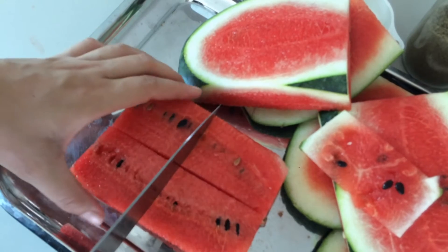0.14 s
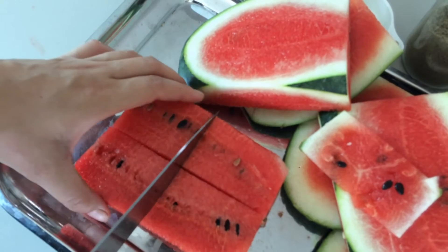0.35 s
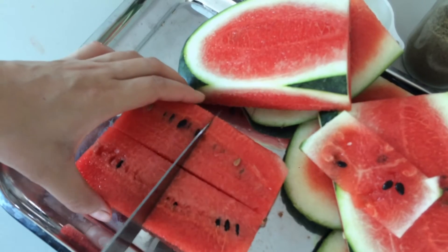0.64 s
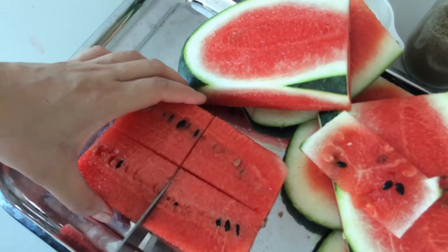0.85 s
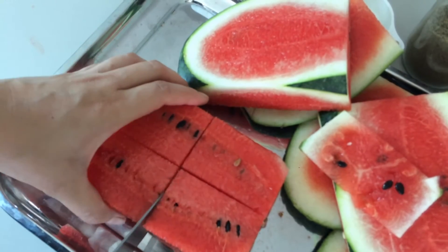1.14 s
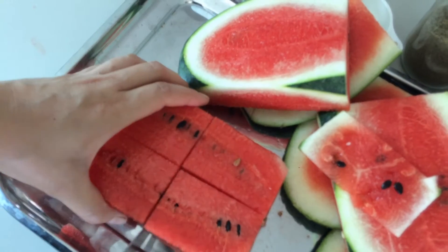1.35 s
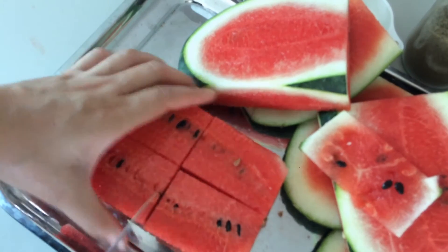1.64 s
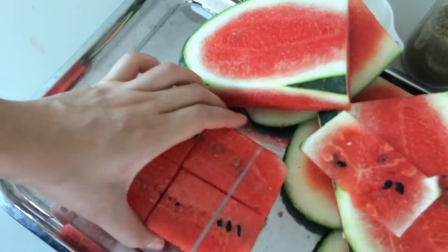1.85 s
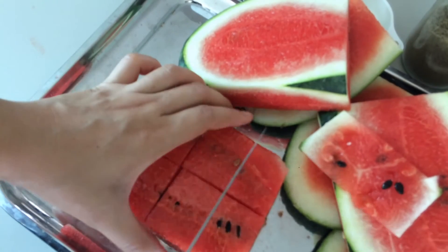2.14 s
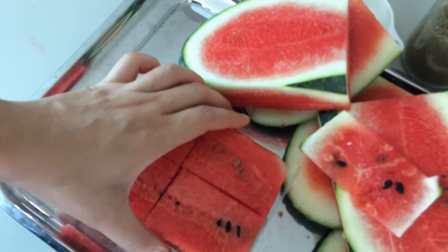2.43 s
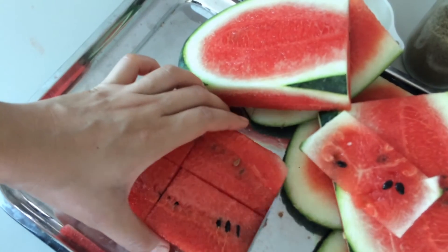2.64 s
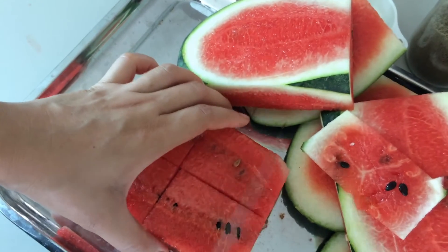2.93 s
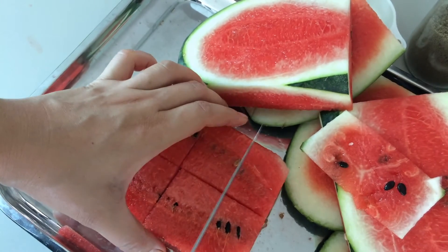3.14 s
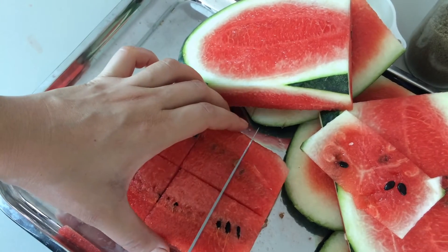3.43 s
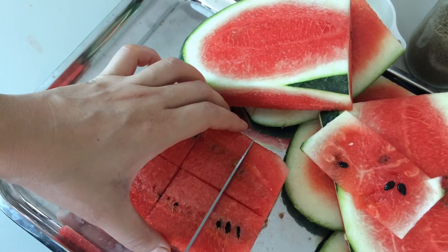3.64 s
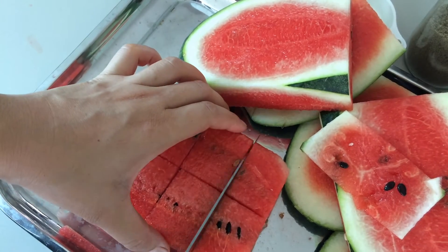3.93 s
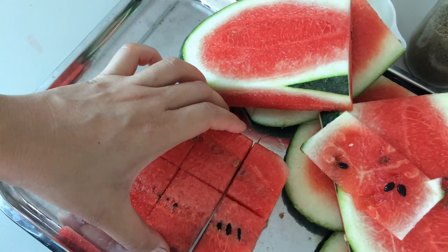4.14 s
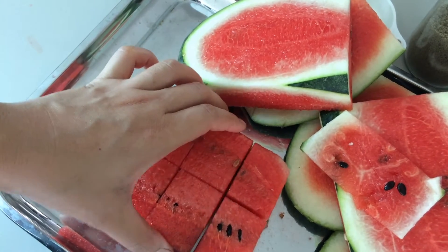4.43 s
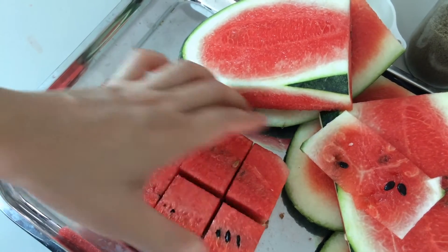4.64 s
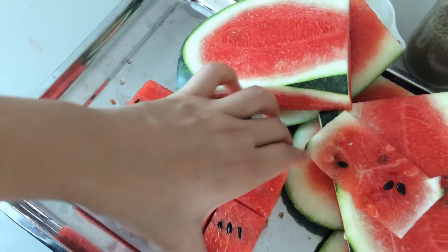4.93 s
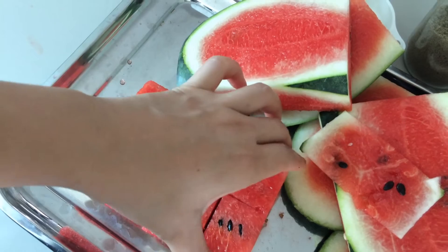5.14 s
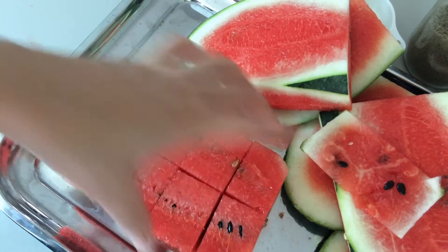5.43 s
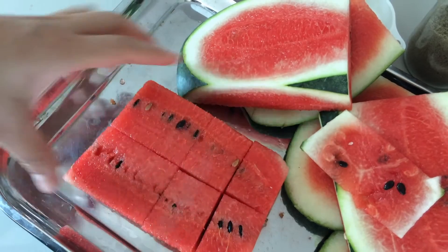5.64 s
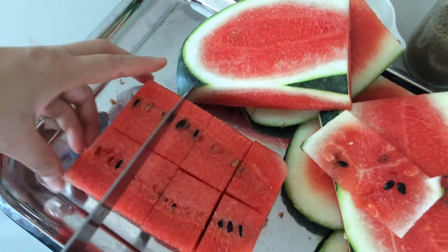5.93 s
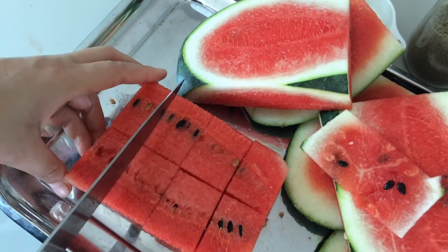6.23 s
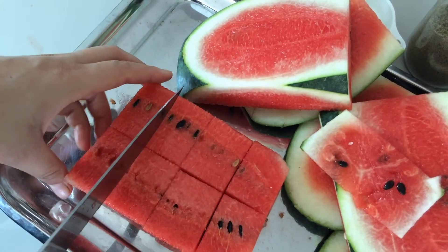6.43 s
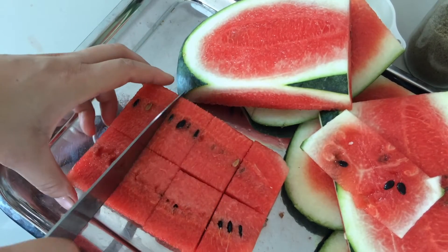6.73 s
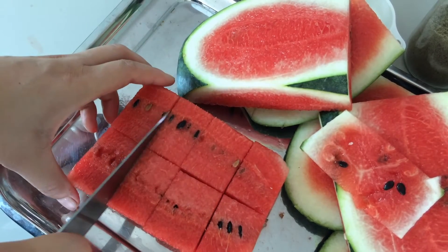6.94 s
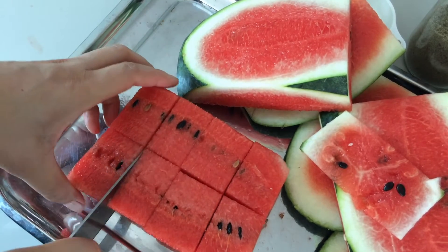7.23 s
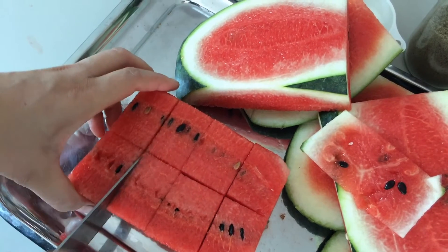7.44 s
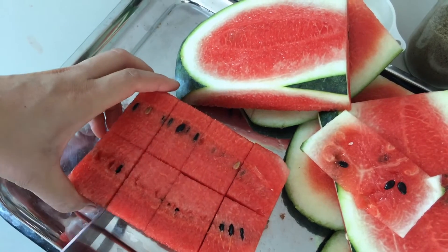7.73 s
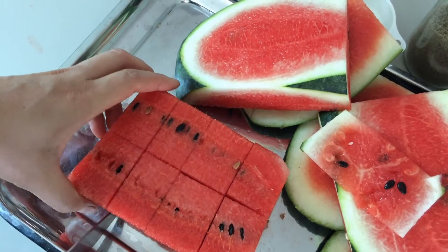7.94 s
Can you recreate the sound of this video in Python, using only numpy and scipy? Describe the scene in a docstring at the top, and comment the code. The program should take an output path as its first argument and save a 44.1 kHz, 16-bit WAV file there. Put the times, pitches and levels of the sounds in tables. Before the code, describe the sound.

A knife slices wet watermelon with faint crisp fizz and knocks sharply on a metal tray, while low air puffs thump the microphone in a quiet kitchen.

```python
"""A fan hums and air puffs at the microphone in a kitchen, with insects hissing far outside.
Close by, a knife slides through watermelon and knocks on the sheet-metal tray below.
Fan and insects are noise through resonances; puffs are short pulses of low pitch over random eddies.
Wet flesh is dense bursts of noise under the pressure of each stroke.
A blow is a rattle of edge on metal whose first shove rings the modes and clatter of the tray."""
import sys
import numpy as np
from scipy import signal
from scipy.io import wavfile
from scipy.ndimage import uniform_filter1d

SR = 44100
rng = np.random.default_rng(int(sys.argv[2]) if len(sys.argv) > 2 else 0)


def bounce(signal):
    """Save signal as a 16-bit WAV file at the path given by the first command-line argument."""
    frames = np.transpose(np.atleast_2d(signal))
    limited = np.clip(frames, -1, 1)
    pcm = np.round(limited * 32767).astype(np.int16)
    wavfile.write(sys.argv[1], SR, pcm)


N = 355887
T = np.arange(N) / SR  # time in seconds


def gain_of(db):
    """Decibels to an amplitude factor."""
    return 10 ** (np.asarray(db) / 20)


def evened(x):
    """Scales to rms 1."""
    return x / np.sqrt(np.mean(x ** 2) + 1e-20)


def read(points, hz):
    """Reads a table of (Hz, value) on a log-frequency axis."""
    f, value = np.transpose(points)
    return np.interp(np.log(hz + 1), np.log(f + 1), value)


def add(mix, s, sound):
    """Mixes a sound in at s seconds."""
    part = mix[max(round(s * SR), 0):][:len(sound)]
    part += sound[:len(part)]


def coloured(x, gain_db):
    """Minimum-phase filter, so nothing sounds ahead of the attack; gain_db is a function of Hz."""
    hz = abs(np.fft.fftfreq(4096, 1 / SR))
    log_gain = np.log(gain_of(np.maximum(gain_db(hz), -100)))
    taps = np.fft.ifft(np.exp(np.conj(signal.hilbert(log_gain)))).real[:2048]
    return signal.oaconvolve(x, taps)[:len(x)]


def resonate(x, hz, width):
    """A resonance of gain 1: shift hz down to zero, smooth, shift back."""
    turn = np.exp(2j * np.pi * hz * T)
    r = np.exp(-np.pi * width / SR)
    return 2 * (turn * signal.lfilter([1 - r], [1, -r], x / turn)).real


def wander(top_hz):
    """Slow random drift of about rms 1, a sum of sines up to top_hz."""
    t = T[::64]
    slow = np.zeros(len(t))
    for f in np.geomspace(top_hz / 20, top_hz, 24):
        slow += np.sin(2 * np.pi * (f * t + rng.random())) / np.sqrt(f)
    return np.interp(T, t, evened(slow))


def swell(length, rise, fall):
    """Pressure that rises, holds and eases, all in seconds."""
    t = T[:round(length * SR)]
    return np.sin(np.pi / 2 * np.clip(np.minimum(t / rise, (length - t) / fall), 0, 1)) ** 2


def dying(x, decays):
    """Lets each band of x die at its own speed; energy 1."""
    hz, t, z = signal.stft(x, SR, nperseg=256)
    fade = gain_of(-60 * t / read(decays, hz)[:, None])
    tail = signal.istft(z * fade, SR, nperseg=256)[1][:len(x)]
    return tail / np.linalg.norm(tail)


def kitchen():
    """Steady air noise of the place, with faint drifting patches in time and pitch."""
    # Spectrum of the air. Each row: pitch in Hz, relative level in dB per Hz.
    air_spectrum = [(30, -21.5), (70, -13.5), (130, -11), (206, -3), (300, -11.5), (420, -17.5), (620, -11),
                    (1340, -12.5), (2400, -22.5), (4050, -29.5), (9600, -34), (10900, -37), (12200, -42.5),
                    (16000, -45)]
    frames, hz = N // 256 + 5, np.fft.rfftfreq(1024, 1 / SR)
    a, b, patches = rng.standard_normal((frames, 513, 3)).T
    patches = uniform_filter1d(patches, 12, 0)  # across pitch
    patches = evened(uniform_filter1d(patches, 14, 1))  # along time
    z = (a + 1j * b) * gain_of(read(air_spectrum, hz)[:, None] + 1.3 * patches)
    air = signal.istft(z, nperseg=1024, noverlap=768)[1][:N]
    return gain_of(-49) * evened(air)


def insects():
    """A far chorus: broad bands of resonant hiss, each trembling a little on its own."""
    # Bands of hiss. Each row: centre in Hz, width of each of two resonances in Hz, relative level in dB.
    singers = [(5440, 580, -7), (5950, 520, -11), (6470, 560, -8), (6830, 360, -7.5), (7484, 570, -4.5),
               (7980, 410, -6), (8640, 690, -9.5)]
    # Balance of high against low singers. Each row: time in seconds, tilt in dB an octave.
    balance = [(0, 2), (1, 0), (2, 1.5), (3, -1.5), (4, -2), (5.2, -7.5), (6.3, 0), (7, 4), (7.6, 2),
               (8.07, 1)]
    chorus_db = -54.5
    slope = np.interp(T, *np.transpose(balance))
    out = np.zeros(N)
    for hz, width, db in singers:
        tremble_db = 1.3 * wander(60) + 1.33 * wander(3.01)
        level = gain_of(chorus_db + db + slope * np.log2(hz / 7000) + tremble_db)
        hiss = resonate(resonate(rng.standard_normal(N), hz, width), hz, width)
        out += level * evened(hiss)
    return out


def fan():
    """Motor tones that waver: a sine and noise through one resonance give each a fuzzy skirt."""
    # Motor tones, lowest first. Each row: pitch in Hz, width in Hz, relative level in dB.
    motor_tones = [(211.2, 8.5, -1), (283.5, 12.3, -11), (492, 4.9, -19), (598, 4.2, -24)]
    # Course of the hum. Each row: time in seconds, level in dB, lift of the upper tones in dB.
    course = [(0, -52, 3), (1, -60, 19.5), (1.5, -52.5, 9), (2.5, -51, 6.5), (3.5, -51.5, 2), (4, -62, 13),
              (4.6, -55.5, 9.5), (5.5, -57, 1), (6.6, -54, 6.5), (7.3, -57, 12.5), (8.07, -65, 7)]
    s, db, upper_db = np.transpose(course)
    level, upper = np.interp(T, s, db), np.interp(T, s, upper_db)
    out = np.zeros(N)
    for k, (hz, width, tone_db) in enumerate(motor_tones):
        gain = gain_of(level + tone_db + upper * (k > 0) + 1.23 * wander(2.7))
        drive = rng.standard_normal(N) + 0.03 * np.sin(2 * np.pi * hz * T)
        out += gain * evened(resonate(drive, hz, width))
    return out


def puffs():
    """Each strong eddy pushes the diaphragm briefly, with a slower heave and a sharp edge.

    Small eddies come at random between them.
    """
    # Strong puffs at the microphone. Each row: middle in seconds, level in dB, pitch in Hz, length in cycles.
    strong = [(0.174, -26.5, 126, 1.1), (0.238, -22, 120, 0.99), (0.391, -26.5, 127, 1.3),
              (0.436, -30, 98, 1.7), (0.492, -28, 87, 1.2), (0.624, -32, 105, 2.9), (0.65, -28, 106, 1.7),
              (0.693, -18, 162, 1.3), (0.849, -21.5, 120, 0.8), (0.865, -24.5, 93, 1.9),
              (0.933, -21, 220, .9), (1.782, -27, 129, 0.96), (2.155, -25.5, 87, 1.3),
              (2.212, -33, 114, 1.6), (2.407, -26.5, 114, 1.25), (2.523, -29, 100, 0.88),
              (2.602, -27, 98, 2), (2.621, -30, 119, 1.5), (2.745, -28.5, 80.5, 1.5),
              (2.923, -14, 99, 0.92), (2.981, -33, 134, 1.9), (3.033, -33, 89, 1.7), (3.168, -33, 109, 1.4),
              (3.263, -39, 137, 2.4), (3.494, -24.5, 91.5, 1.5), (3.781, -33.5, 100, 1.4),
              (4.054, -27.5, 103, 2.1), (4.097, -24, 99, 0.59), (4.137, -27, 134, 0.93),
              (4.438, -26.5, 92, 0.95), (4.574, -27, 108, 2.8), (4.617, -29, 81.5, 1.5),
              (4.742, -27, 96, 1.1), (4.761, -27, 88, .9), (4.778, -26, 74.5, 1.1), (4.83, -27, 71, 0.99),
              (4.862, -21, 98, 1.24), (4.895, -20.5, 160, 1.8), (5.039, -31.5, 91, 2),
              (5.169, -13, 104, 1.34), (5.244, -23, 156, 1.2), (5.353, -24.5, 77, 1.4),
              (5.487, -20.5, 119, 1.17), (5.561, -24.5, 84, 2.8), (5.573, -20, 77, 1.4),
              (5.615, -25.5, 95, 0.75), (5.716, -26, 86, 1.8), (5.815, -30.5, 128, 1.05),
              (5.916, -33, 79, 3.1), (6.02, -25, 134, 2.3), (6.156, -27.5, 103, 1.3),
              (6.255, -34.5, 83, 1.7), (6.316, -22, 102, 1.06), (6.414, -29.5, 83, 1.9),
              (6.497, -34.5, 113, 1), (6.935, -30.5, 115, 1.3), (7.188, -15.5, 125, 0.78),
              (7.237, -16.5, 119, 0.66), (7.264, -18.5, 93, 1.7), (7.311, -31, 81, 3.2),
              (7.376, -31, 85, 1.9), (7.431, -20.5, 110, 1.2), (7.502, -28.5, 108, 1.3),
              (7.533, -25, 73, 2.3), (7.588, -14, 103.4, 1.7), (7.615, -17.5, 109, 1.5),
              (7.634, -21, 129.7, 1.5), (7.687, -34, 94, 3.2), (7.735, -14.5, 136, 1.17),
              (7.78, -25, 92, 0.97), (7.812, -26, 168, 0.98), (7.843, -27.5, 100, 1.6),
              (7.884, -12, 158, 1.2), (7.947, -23.5, 222, 0.59)]
    # The small eddies. Each row: time in seconds, level in dB.
    draught = [(0.0, -76), (0.2, -36), (0.36, -49.5), (0.78, -44.5), (1.03, -101), (2.04, -59), (2.6, -46),
               (3.73, -52.5), (4.43, -54), (4.72, -44), (4.96, -53.5), (6.36, -45.5), (6.52, -51),
               (7.03, -49), (7.42, -46), (7.75, -26), (7.96, -43), (8.07, -52)]
    eddies_per_s = 60
    out = np.zeros(N)
    t = T[:4000] - T[2000]
    turns = rng.random((len(strong), 3))
    for (s, db, hz, cycles), (turn, edge_turn, heave_turn) in zip(strong, turns):
        push = np.cos(2 * np.pi * (hz * t + turn)) / np.cosh(4 * hz * t / cycles)
        edge = np.cos(2 * np.pi * (1.94 * hz * t + edge_turn)) / np.cosh(t / 0.0011)
        heave = np.cos(2 * np.pi * (55 * t + heave_turn)) / np.cosh(t / 0.013)
        edge = gain_of(-1.0 + 0.47 * db) * edge  # the stronger the puff, the sharper
        add(out, s - T[2000], gain_of(db) * (push + gain_of(-13.5) * heave + edge))
    s, db = np.transpose(draught)
    hits = rng.random(N) < eddies_per_s / SR
    eddies = hits * rng.uniform(-1.24, 1, N) * gain_of(1.2 * wander(36))
    eddies = evened(resonate(resonate(eddies, 65, 113), 65, 113))
    out = out + gain_of(np.interp(T, s, db)) * eddies
    return signal.sosfilt(signal.butter(4, 38, "high", fs=SR, output="sos"), out)


def room(x):
    """Sparse echoes of random sign, each band dying at its own speed."""
    # Decay of the kitchen. Each row: pitch in Hz, time to lose 60 dB in seconds.
    echo_decay = [(300, 0.95), (1000, 0.45), (2500, 0.46), (5000, 0.53), (9000, 0.23), (16000, 0.32)]
    taps = np.zeros(SR)
    at = np.arange(200, SR - 20, 20)
    taps[at + rng.integers(0, 20, len(at))] = rng.choice([-1., 1.], len(at))
    return signal.fftconvolve(x, dying(taps, echo_decay))[:N]


def flesh():
    """Cells burst as dense tiny clicks under the blade: a bright fizz and a duller crunch."""
    # Blade and fingers press through wet flesh.
    # Each row: start in seconds, length in seconds, fizz level in dB, crunch level in dB.
    strokes = [(.15, 0.19, -65, -61), (.22, 0.46, -58.5, -60), (0.6, 0.79, -56.5, -50.5),
               (1.046, 0.018, -58.5, -56), (1.12, .13, -84, -71), (1.23, 0.091, -55, -57),
               (1.305, 0.27, -59, -58.5), (1.61, .03, -62, -70), (3.447, 0.37, -65, -68),
               (3.6, 0.54, -59, -60.5), (3.858, 0.43, -79, -54), (4.322, 0.03, -53, -49),
               (4.417, 0.24, -79, -52), (5.004, 0.18, -66, -57.5), (5.175, 0.059, -59, -55),
               (5.239, 0.05, -58, -50), (5.53, 0.027, -57, -51), (5.718, .12, -67, -63),
               (6.4, .016, -65, -61), (6.552, 0.29, -58.5, -61.5), (6.69, 0.13, -61, -61),
               (6.762, 0.44, -61, -53.5), (7.171, 0.17, -45.5, -40.5), (7.3, .14, -61, -71),
               (7.456, 0.29, -61, -55.5), (7.746, 0.051, -57, -56), (7.68, .24, -63, -62)]
    # Spectra of fizz and of crunch. Each row: pitch in Hz, relative level in dB per Hz.
    fizz_spectrum = [(600, -24), (1500, -9), (3000, -1), (6000, -1.5), (10000, -2), (13500, -3.5),
                     (16500, -5)]
    crunch_spectrum = [(400, -12), (1200, -0.5), (2500, -2), (4500, -8.5), (8000, -19)]
    press_share, ease_share = 0.3, 0.35  # parts of a stroke in which the pressure builds and eases
    fizzing, crunching = np.zeros((2, N))
    for s, length, fizz_db, crunch_db in strokes:
        press = swell(length, press_share * length, ease_share * length)
        add(fizzing, s, gain_of(fizz_db) * press)
        add(crunching, s, gain_of(crunch_db) * press)
    burst_db = 2.94 * np.minimum(rng.exponential(1, (2, N)), 6)
    bursts = rng.standard_normal((2, N)) * gain_of(burst_db)
    clumps = gain_of(0.62 * wander(110) + 1.8 * wander(25))  # fine clumping, unsteady pressure
    fizz = evened(coloured(bursts[0], lambda f: read(fizz_spectrum, f))) * fizzing
    crunch = evened(coloured(bursts[1], lambda f: read(crunch_spectrum, f))) * crunching
    return clumps * (fizz + crunch)


def contact(drive, hz, narrow_db):
    """Colours a contact force around hz, losing narrow_db about an octave off; energy 1."""
    # Spectrum of edge on metal. Each row: pitch in Hz, relative level in dB per Hz.
    crack = [(150, -20), (400, 0), (900, -4), (1900, -3.5), (3200, -5.5), (5400, -9), (10000, -11.5),
             (16000, -23)]
    direct = coloured(drive, lambda f: read(crack, f) - narrow_db * np.log2((f + 50) / hz) ** 2)
    return direct / np.linalg.norm(direct)


def tray_response(ring_db, clatter_db, favoured_hz):
    """The clear modes and the dense clatter of the sheet, strongest near the favoured pitch."""
    # Clear modes of the sheet. Each row: nominal pitch in Hz, relative level in dB, t60 in seconds.
    modes = [(1150, 0.5, 0.053), (1598, -2, 0.11), (1850, 1, 0.1), (2080, -11, 0.16), (2100, -5.5, 0.11),
             (2440, -3.5, 0.15), (2600, 0.5, 0.096), (3100, 3.5, 0.1), (3406, 2.5, 0.11), (3920, 8.5, 0.11),
             (4720, -1, 0.07), (4740, 5, 0.12), (5460, 4, 0.0997), (6640, 7, 0.1), (7200, -27, .08),
             (7580, -25, 0.072)]
    # Decay of the dense modes. Each row: pitch in Hz, t60 in seconds.
    clatter_decay = [(400, 0.29), (1000, 0.39), (2300, 0.35), (5000, 0.49), (9000, 0.29), (16000, 0.32)]
    t = T[:SR // 2]
    ring = np.zeros(len(t))
    # dents split each mode into a rough cluster
    splits = rng.uniform(-0.74, 1, (len(modes), 4, 1))
    for (hz, db, t60), split in zip(modes, splits):
        cluster = np.sin(2 * np.pi * hz * (1 + 0.018 * split) * t).sum(0)
        octaves_off = abs(np.log2(hz / favoured_hz))
        ring += gain_of(db - 1.6 * octaves_off - 60 * t / t60) * cluster

    def favour(f):
        return -np.minimum(5.3 * abs(np.log2((f + 50) / favoured_hz)), 7.0)

    clatter = coloured(rng.standard_normal(len(t)), favour)
    chatter = evened(uniform_filter1d(rng.standard_normal(len(t)), 200))
    clatter *= gain_of(0.81 * chatter)  # the loose sheet chatters
    # where the hand does not damp, it rings on, losing 60 dB in 1500 cycles of the favoured pitch
    lasting = coloured(clatter, lambda f: -24 * abs(np.log2((f + 1) / favoured_hz)))
    lasting = lasting * gain_of(-60 * t * favoured_hz / 1500)
    clatter = dying(clatter, clatter_decay) * np.minimum(t / 0.011, 1)
    clatter = clatter + gain_of(-13) * lasting / np.linalg.norm(lasting)
    return gain_of(ring_db) * ring / np.linalg.norm(ring) + gain_of(clatter_db) * clatter


def blow(level_db, hz, narrow_db, t60, *body):
    """A rattle of edge on metal dies fast; its first shove sets the tray going."""
    t = T[:SR // 2]
    rattle = rng.standard_normal(len(t)) * gain_of(-60 * t / t60) * np.minimum(t / 0.0037, 1)
    shove = contact(1. * (t == 0), hz, narrow_db)[:2048]
    ringing = signal.fftconvolve(shove, tray_response(*body))[:len(t)]
    sound = contact(rattle, hz, narrow_db) + ringing
    return gain_of(level_db) * sound * np.sqrt(t60 * SR / (2 * np.log(1000)))  # energy grows with t60


def scrape(length, db):
    """The edge scrapes across the tray, catching and letting go, and the sheet answers."""
    judder_hz, judder_db = 62, -2
    press = swell(length, rise=0.022, fall=0.015)
    press = press * gain_of(db + judder_db * np.cos(2 * np.pi * judder_hz * T[:len(press)]))
    # uneven stick and slip
    slips = rng.standard_normal(SR // 4) * gain_of(2.4 * rng.exponential(1, SR // 4))
    slips = evened(slips)[:len(press)] * press
    rasp = contact(slips, 2270, 5.2) * np.linalg.norm(slips)
    return rasp, signal.fftconvolve(rasp, tray_response(-12.5, -30, 3300))


def tray():
    """All blows on the sheet metal, and the scrape across it."""
    # Blows on the tray. Each row: start in seconds, level in dB, colour centre in Hz,
    # loss an octave off centre in dB, rattle t60 in seconds, ring level in dB, clatter level in dB,
    # pitch in Hz favoured by where the tray is struck and held.
    blows = [(0.9032, -6.5, 2780, 1.5, 0.027, -10.5, -5.5, 1900),
             (.913, -15, 2270, 1.5, 0.13, -15, -26, 1890), (1.009, -26.5, 1150, 7, 0.038, -17, -26, 1150),
             (1.272, -41, 1900, 6, 0.039, -16, -14, 1850), (1.508, -21, 2680, 5, 0.032, -3, -9, 3100),
             (4.1788, -4, 2600, 1.5, 0.015, -8, -6, 2440), (4.19, -17, 3400, 3, 0.098, -18, -23, 2600),
             (4.208, -21, 1500, 1.5, 0.043, -28, -3, 2300), (5.256, -33.5, 2180, 5.5, 0.12, 1.5, -10, 3920),
             (5.4348, -17.5, 3060, 4, 0.1, -3, -21, 2720), (5.449, -20.5, 1430, 8, 0.04, -4, -29, 1400),
             (7.216, -5, 1630, 1.37, 0.027, -17.5, -17, 1950),
             (7.2387, -6, 2170, 10, 0.012, -12, -29, 2300),
             (7.2463, -11.5, 1520, 4.5, 0.027, -11, -28, 1880),
             (7.3363, -28.5, 2340, 15, 0.056, -23, -20, 2000),
             (8.0361, -10.5, 2650, 4.5, 0.026, -20, -11, 2600),
             (8.049, -26.5, 2160, 4, 0.19, -29, -6, 2100)]
    # The scrape, one row: start in seconds, length in seconds, level in dB.
    scrape_row = (1.522, 0.06, -28)
    out = np.zeros(N)
    for s, *row in blows:
        add(out, s, blow(*row))
    s, length, db = scrape_row
    for sound in scrape(length, db):
        add(out, s, sound)
    return out


def scene():
    """Everything at one microphone; only tray and flesh are given the room's echoes."""
    near = tray() + flesh()
    return (near + gain_of(-18) * room(near) + puffs() + kitchen() + insects() + fan())[None]


def record(dry):
    """Soft overload, then the band limit at 15780 Hz."""
    soft = 1.313 * np.tanh(dry / 1.453)
    low_pass = signal.firwin(511, 15780, window=("kaiser", 9), fs=SR)
    return signal.oaconvolve(soft, low_pass[None], "same")


dry = scene()
out = record(dry)
bounce(out)
```